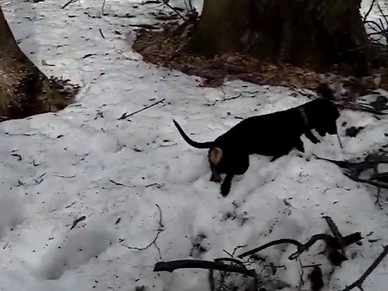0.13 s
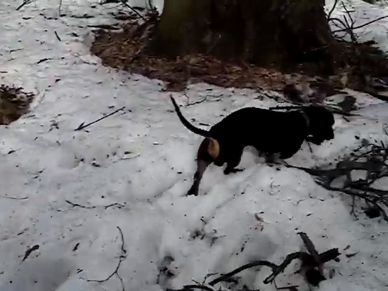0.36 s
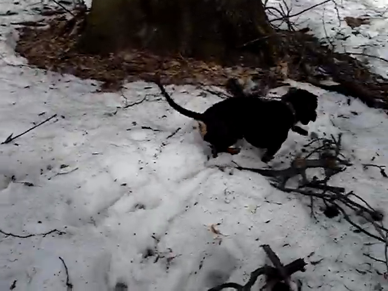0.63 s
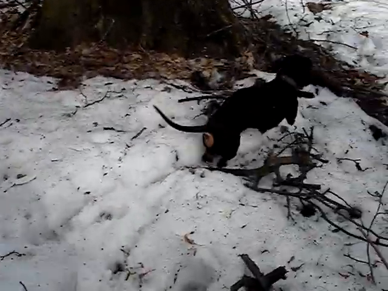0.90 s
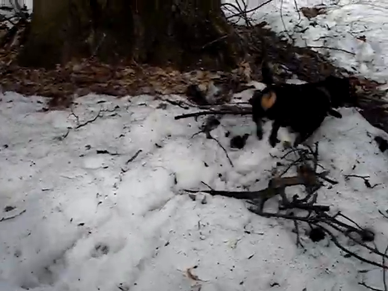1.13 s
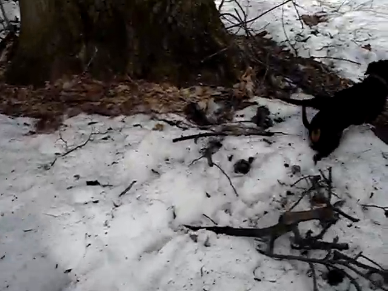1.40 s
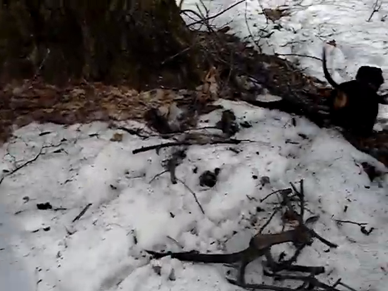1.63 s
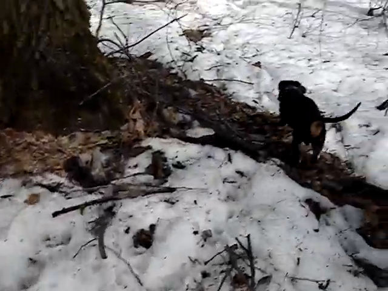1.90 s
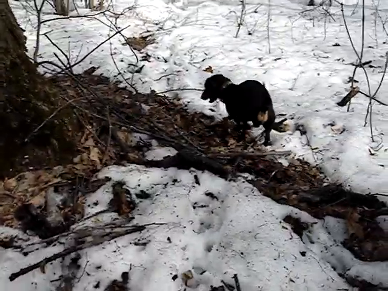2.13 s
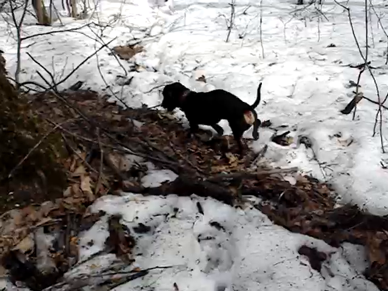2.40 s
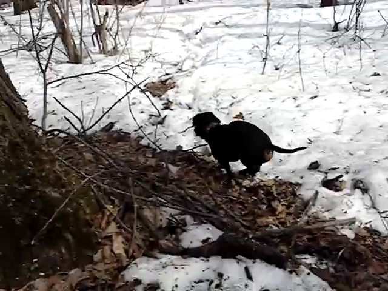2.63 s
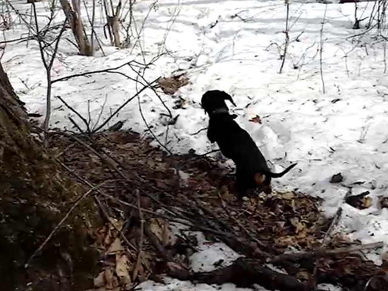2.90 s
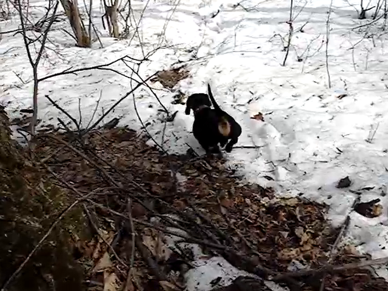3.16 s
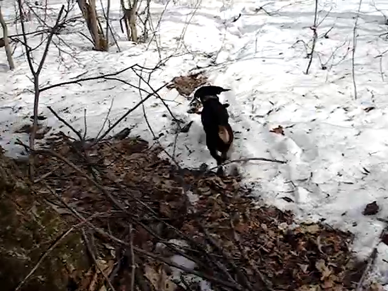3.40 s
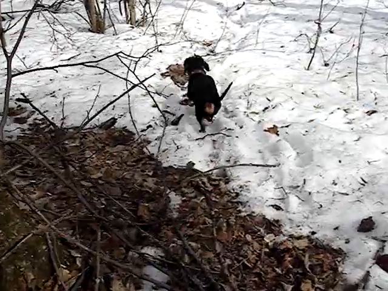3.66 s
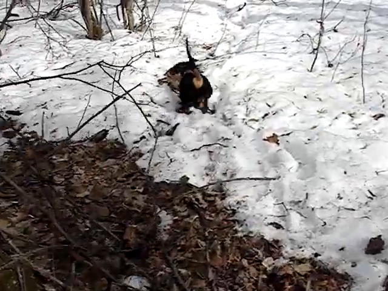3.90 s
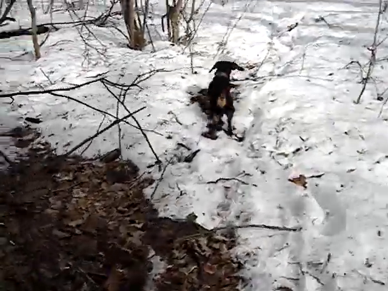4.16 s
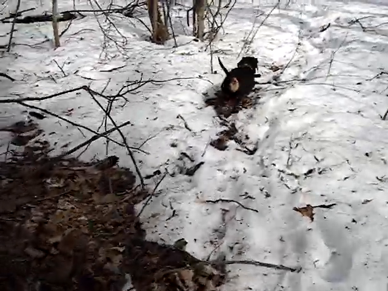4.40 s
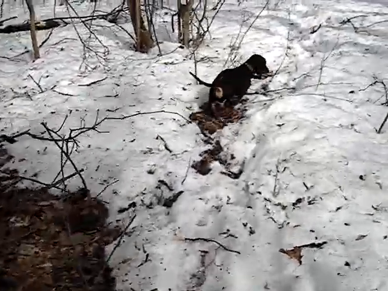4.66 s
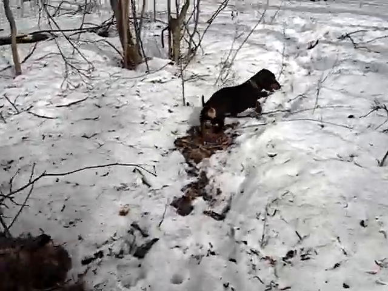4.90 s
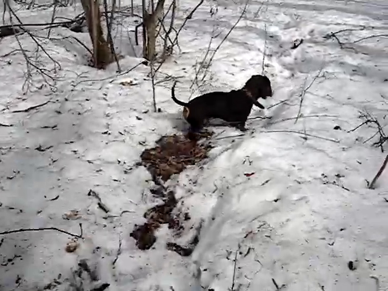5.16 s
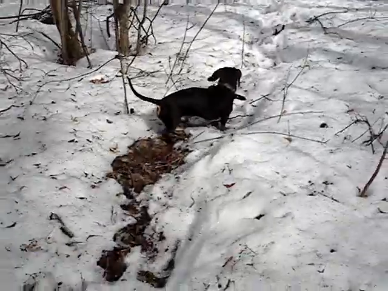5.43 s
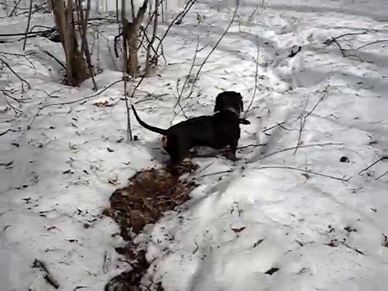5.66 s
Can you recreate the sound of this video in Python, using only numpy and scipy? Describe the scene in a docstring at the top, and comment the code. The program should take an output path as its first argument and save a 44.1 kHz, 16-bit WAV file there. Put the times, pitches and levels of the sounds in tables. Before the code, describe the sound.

Someone walks through crusty snow in a quiet wood, holding a small camera. Dull crunches, crackling crust and fine icy hiss come in uneven bursts. Low casing bumps and a buckle clack come early, then brittle twig snaps throughout, the strongest before three seconds. Later the steps thin into pauses, with one last crunch at the end. Faint steady circuit hiss lies underneath.

```python
"""Boots crush crusty snow, heard by a hand-held camera: bursts of random fractures in three grain sizes
give a dull crunch of packing, a crackle of crust and a fine hiss of crystals. Damped modes and dry noise snap
as twigs and ice, and a loose buckle clacks with its own set of modes. Single pushes jolt the camera and short
scraping tones bump its casing; a dull rustle, stirring bass air and steady circuit hiss lie underneath."""
import sys
import numpy as np
from scipy import signal
from scipy.fft import rfft, irfft, next_fast_len
from scipy.io import wavfile
from scipy.ndimage import uniform_filter1d

SR = 44100
rng = np.random.default_rng(int(sys.argv[2]) if len(sys.argv) > 2 else 0)


def elevation(decibels):
    """Turn decibel levels (scalar or array-like) into linear amplitude ratios."""
    levels = np.asarray(decibels, float)
    return 10 ** (levels / 20)


def transcribe(signal):
    """Save signal, clipped to [-1, 1], as a 16-bit WAV file at the path in sys.argv[1]."""
    frames = np.atleast_2d(signal).T
    limited = np.clip(frames, -1, 1)
    pcm = np.round(limited * 32767).astype(np.int16)
    wavfile.write(sys.argv[1], SR, pcm)


N = 255339
TIME = np.arange(N) / SR
SHORT = TIME[:2000]  # time axis of the small impacts
ONSET = np.clip(SHORT / 0.00059, 0, 1)  # a break takes a moment to run through


def colour(x, points):
    """Causal filter that follows (Hz, dB) points, from the folded cepstrum of the log gain."""
    hz, db = np.transpose(points)
    size = 4096
    grid = np.maximum(np.arange(size // 2 + 1) * SR / size, 1)
    log_gain = np.interp(np.log(grid), np.log(hz), db) * np.log(10) / 20
    cepstrum = irfft(log_gain)
    cepstrum[1:size // 2] *= 2
    cepstrum[size // 2 + 1:] = 0
    impulse = irfft(np.exp(rfft(cepstrum)))[:size // 2]
    return signal.fftconvolve(x, impulse)[:len(x)]


def unit(x):
    """Scale to rms 1."""
    return x / np.sqrt(np.mean(x ** 2))


def walk(rate):
    """Random levels joined every 1 / rate s, with the slow drift taken out; spread 1."""
    steps = rng.standard_normal(int(N / SR * rate) + 2)
    steps = steps - uniform_filter1d(steps, size=5)
    return unit(np.interp(TIME * rate, np.arange(len(steps)), steps))


def flicker(depth_db, wander):
    """Gain that wanders by depth_db and about keeps the mean power."""
    return elevation(depth_db * wander - depth_db ** 2 * np.log(10) / 20)


def grains(rate, spread_db):
    """Random fractures, rate per second: many tiny, a few large."""
    happens = rng.random(N) < rate / SR
    size = rng.exponential(size=N)
    sign = rng.standard_normal(N)
    return happens * elevation(spread_db * size) * sign


def add(out, s, sound):
    """Mix a short sound in at s seconds."""
    i = int(s * SR)
    out[i:i + len(sound)] += sound[:N - i]


def ring(hz, t60):
    """One damped mode, falling 60 dB in t60 seconds."""
    return np.sin(2 * np.pi * hz * SHORT) * np.exp(-np.log(1000) * SHORT / t60)


def patchy_texture(x, depth_db):
    """Uneven, patchy texture: each half octave flickers at random on its own, more strongly towards the treble."""
    size = next_fast_len(N)
    spectrum, hz = rfft(x, size), np.arange(size // 2 + 1) * SR / size
    octave = np.log2(np.maximum(hz, 1) / 250)
    out = irfft(spectrum * np.clip(-2 * octave, 0, 1), size)[:N]  # the lowest part stays steady
    for k, depth in enumerate(np.linspace(*depth_db, 12)):
        share = np.clip(1 - np.abs(2 * octave - k), 0, 1)
        out += irfft(spectrum * share, size)[:N] * flicker(depth, walk(55))
    return out


# Swells of the crushing snow: (peak time [s], level [dB], depth [dB], rise [s], fall [s]);
# depth lifts the packing and lowers the fine crystals; rise and fall play no shorter than 0.003 s
CRUNCHES = [(0.0, -52, -1.5, .1, 0.091), (0.121, -42, 7.5, 0.0065, 0.019), (.14, -43, 1.5, 0.045, 0.086),
            (.227, -41, 4, 0.031, 0.019), (.378, -48.5, -3, 0.098, 0.0053),
            (0.458, -40.5, -5.5, 0.039, .04), (0.528, -31.5, 2.5, 0.063, 0.054),
            (.57, -39, 4.5, 0.028, 0.083), (.62, -41.5, -1, 0.041, 0.077), (.72, -40, 4, 0.035, .03),
            (.737, -32.5, 3, 0.014, 0.037), (.9, -41, 0, 0.07, 0.037), (.992, -39, -0.5, 0.049, 0.049),
            (1.079, -37, 0, 0.0043, 0.016), (1.195, -40, -2, 0.054, 0.031),
            (1.35, -42.5, -0.5, 0.086, 0.021), (1.374, -33, 3.5, 0.033, 0.016),
            (1.442, -34.5, -2, 0.058, 0.017), (1.47, -43.5, 4, 0.037, 0.042),
            (1.515, -41, -1.5, 0.046, 0.019), (1.591, -52, -1, 0.0084, .045),
            (1.72, -45.5, -0.5, 0.088, 0.055), (1.897, -40, -0.5, 0.074, 0.021),
            (1.929, -35, -1.5, 0.021, 0.032), (1.971, -38.5, -7, 0.016, 0.046),
            (2.015, -30, 3, 0.052, 0.064), (2.108, -38.5, 2.5, 0.032, 0.084),
            (2.269, -45.5, -1.5, 0.03, 0.084), (2.386, -37.5, -4, 0.0049, 0.02),
            (2.476, -48, -3, 0.011, 0.12), (2.674, -30.5, 1, 0.056, 0.033), (2.719, -36, 4.5, 0.049, 0.026),
            (2.8, -41, 2.5, 0.041, 0.022), (2.884, -41.5, -3.5, 0.048, 0.014),
            (3.016, -49, -3.5, 0.089, 0.02), (3.07, -50.5, -8, 0.0023, 0.032),
            (3.218, -43.5, -1, 0.06, 0.082), (3.338, -43, -4.5, 0.027, 0.079),
            (3.414, -34.5, 3, 0.057, 0.048), (3.48, -41.5, 5, 0.069, .09), (3.536, -42.5, 2, 0.034, 0.034),
            (3.704, -49.5, 1, 0.32, 0.066), (3.82, -42.5, 2, 0.037, 0.018), (3.842, -35, 0, 0.02, 0.024),
            (3.948, -50.5, 1.5, 0.073, 0.12), (4.077, -32, 5, 0.0032, 0.033), (4.11, -40.5, 6, .02, 0.018),
            (4.168, -32, 3.5, 0.036, 0.035), (4.311, -39.5, 4, 0.092, 0.028),
            (4.381, -40.5, 4, 0.071, 0.08), (4.6, -50.5, 2, .13, 0.11), (4.8, -50, 0.5, 0.094, 0.14),
            (4.937, -38, -7, 0.002, 0.036), (4.963, -28, 1, 0.021, 0.039), (5.023, -40, 4.5, 0.051, 0.033),
            (5.075, -42.5, -0.5, .04, 0.1), (5.215, -55.5, -5.5, 0.15, .05),
            (5.3, -51.5, -1.5, 0.074, 0.069), (5.5, -56, -1.5, 0.36, .12), (5.626, -47, 0, .007, 0.028),
            (5.69, -39, 3.5, 0.0078, 0.035), (5.735, -28.5, 3, 0.039, 0.042)]
# How icy the crust is along the path: (time [s], crust level [dB])
GROUND = [(0.0, 1), (0.75, -4), (1.0, 3.5), (1.45, 2), (2.0, -1), (2.3, 4), (2.7, -0.5), (3.2, 3.5),
          (3.5, -1.5), (3.85, 2), (4.15, 2), (4.4, -0.5), (5.0, 0.5), (5.7, -1.5)]
# Tone of the dull deep packing: (frequency [Hz], relative level [dB])
PACK = [(100, -32.5), (250, -12), (400, -6.5), (650, -2), (900, -2.5), (1300, -3.5), (1700, -12.5),
        (2500, -44)]
# Tone of the breaking crust: (frequency [Hz], relative level [dB])
CRUST = [(900, -36), (1300, -16), (1600, 1.5), (2500, 0), (3700, -4.5), (4500, -20.5), (6500, -55)]
# Tone of the fine crystals: (frequency [Hz], relative level [dB])
CRYSTAL = [(2600, -46.5), (3600, 0), (4300, 4), (5500, 1), (7500, 0), (10000, -7.5), (11000, -78)]


def snow():
    """Crunches swell and die in three sizes of fracture: crystals lead, crust follows, packing peaks last."""
    at, level_db, depth_db, rise, fall = np.array(CRUNCHES).T[:, :, None]
    icy_db = np.interp(at, *np.transpose(GROUND))
    lag_s = 0.004  # from one depth to the next
    edge = 2.01  # the higher, the flatter the top of a crunch and the more sudden its ends
    coarse = TIME[::64]

    def load(db, lag, fall_scale=1):
        """Gain of one grain size: the crunches add up in power."""
        t = coarse - at - lag
        length = np.maximum(np.where(t < 0, rise, fall * fall_scale), .003)
        power = elevation(2 * db) * np.exp(-2 * (np.abs(t) / length) ** edge)
        return np.interp(TIME, coarse, np.sqrt(power.sum(axis=0)))

    # the sole slips in small jerks, which shake every grain size together
    jerk = walk(90)
    big = unit(grains(1500, 1.5))  # large fractures heard in all three layers
    pack = unit(colour(big + 1.47 * unit(grains(5000, 0.45)), PACK))
    crust = unit(colour(0.63 * big + unit(grains(7000, 1.6)), CRUST))
    crystal = unit(colour(0.058 * big + unit(grains(15000, 2.4)), CRYSTAL))

    pack_load = load(level_db + depth_db + 0.09, lag_s, fall_scale=0.92)
    crust_load = load(level_db + 0.1 * depth_db + icy_db - 1.0, 0)
    crystal_load = load(level_db - depth_db + 0.8, -lag_s)
    return (pack * pack_load * flicker(0.25, jerk)
            + crust * crust_load * flicker(0.27, jerk)
            + crystal * crystal_load * flicker(1.68, jerk))


# Tone of the rustle of movement: (frequency [Hz], relative level [dB])
RUSTLE = [(60, -11), (140, -8.5), (220, 0.5), (500, 5.5), (950, 0.5), (1500, -18), (3000, -15), (6000, -35)]


def rustle():
    """A dull rustle of dense random grains while the walker moves, fading out over 0.36 s."""
    silent_s = 5.16
    moving = np.clip((silent_s - TIME) / 0.36, 0, 1)
    return unit(colour(grains(6000, 2.5), RUSTLE)) * elevation(-48) * moving


# Air stirring at the microphone port: (time [s], level [dB])
STIR = [(0.0, -60), (0.4, -51), (0.6, -60), (3.2, -66.5), (3.7, -69), (5.05, -62.5), (5.27, -77)]


def stirring_air():
    """Bass noise that swells and sinks slowly, with a quicker unsteadiness on top."""
    bass = unit(colour(rng.standard_normal(N), [(20, -9), (65, 20.5), (130, 6.0), (300, -39), (2000, -83)]))
    swell = elevation(np.interp(TIME, *np.transpose(STIR)))
    return bass * swell * flicker(2.5, walk(8.2))


# Tone of the circuit hiss: (frequency [Hz], relative level [dB])
HISS = [(20, -8), (150, -7.5), (400, 0), (610, 3), (1300, 2), (2200, -7.5), (6500, -28), (10500, -28)]


def hiss():
    """Steady noise of the preamplifier, with a narrow high band around 7.7 kHz."""
    steady = unit(colour(rng.standard_normal(N), HISS)) * elevation(-53.5)
    band = [(6500, -37), (7400, -16), (7700, 18), (8000, 1), (9000, -23)]
    whistle = unit(colour(rng.standard_normal(N), band)) * elevation(-68.0)
    return steady + whistle


# Fingers on the casing: (centre time [s], level [dB], pitch [Hz])
BUMPS = [(0.192, -45, 111), (0.212, -29.5, 121), (0.243, -26, 333), (.262, -30.5, 187), (0.28, -25, 191),
         (.3, -29.5, 168), (.323, -31, 160), (0.334, -39, 130), (0.402, -32.5, 141), (3.84, -26.5, 240),
         (4.08, -28.5, 225), (4.6, -32, 244)]


def bumps():
    """Soft, scraping bumps ring the casing for a cycle or two under a bell-shaped swell."""
    out = np.zeros(N)
    half_cycles = 1.1  # half length of a bump, in cycles of its pitch
    centre = TIME[1000]
    t = SHORT - centre
    for (s, db, hz), rub in zip(BUMPS, rng.standard_normal((len(BUMPS), 2000))):
        tone = np.cos(2 * np.pi * hz * t)
        scrape = 2.2 * uniform_filter1d(rub, size=60)
        swell = np.exp(-2 * (t * hz / half_cycles) ** 2)
        add(out, s - centre, -elevation(db) * (tone + scrape) * swell)
    return out


# Breaking twigs and ice: (time [s], level [dB], pitch [Hz], knock against it [dB], dry crack against it [dB])
SNAPS = [(.35, -33, 2820, -30, 4), (1.5551, -28, 4580, -22, 3), (1.5767, -29, 4240, -29, 3),
         (1.5842, -28, 3200, -25, 3), (1.6246, -31, 3940, -13, 2), (1.7274, -22, 3430, -10, 5),
         (1.7963, -33, 1200, -14, 6), (1.8831, -18, 2220, -12, 0), (1.9012, -26, 2800, -8, 3),
         (2.1195, -22, 1190, -4, 0), (2.2964, -29, 2190, -16, 0), (2.381, -22, 2440, -6, -2),
         (2.4139, -31, 3100, -13, 0), (2.4718, -27, 3850, -16, 0), (2.51, -29, 3500, -22, -2),
         (2.6724, -10, 1900, -2, -4), (2.688, -20, 1740, -14, 0), (2.8885, -14, 3250, -20, -5),
         (2.9684, -33, 4800, -19, 0), (3.0627, -24, 3700, -28, 3), (3.695, -27, 2170, -5, -2),
         (3.836, -17, 2100, -3, -2), (4.0715, -20, 2060, -5, -2), (4.62, -22, 1840, -6, -6),
         (4.7103, -31, 2700, -8, 0), (4.9853, -19, 1250, -7, 2), (5.0536, -25, 4500, 2, 4),
         (5.0633, -16, 4700, -6, 11), (5.0938, -22, 3000, -4, 7), (5.1088, -30, 1900, -14, 6),
         (5.1135, -28, 1550, -14, 5), (5.118, -29, 1570, -16, 6), (5.2103, -30, 3160, -27, 0),
         (5.2284, -24, 1230, -33, -4), (5.445, -39, 1060, -23, 5), (5.4894, -37, 1240, 0, 3)]


def snaps():
    """A brittle break: short modes, a dull knock, and a pressure dip that rebounds, with a dry spray."""
    out = np.zeros(N)
    t60 = 0.014  # ring of a twig, s
    chance, crack = rng.random((len(SNAPS), 3)), rng.standard_normal((len(SNAPS), 2000))
    dip = np.exp(-((SHORT - .0004) / .0001) ** 2)
    rebound = .08 * np.exp(-((SHORT - .0016) / .001) ** 2)
    for (s, db, hz, knock_db, crack_db), c, noise in zip(SNAPS, chance, crack):
        upper = .7 * ring(hz * (1.1 + .3 * c[0]), .7 * t60)
        lower = .7 * ring(hz * (.7 + .2 * c[1]), .7 * t60)
        body = ring(hz, t60) + upper + lower
        knock = elevation(knock_db) * ring(550 + 300 * c[2], 0.89 * t60)
        spray = .7 * uniform_filter1d(noise, size=3) * np.exp(-np.log(1000) * SHORT / t60)
        dry_crack = elevation(crack_db) * (dip - rebound + spray * ONSET)
        add(out, s + .0007, -elevation(db) * ((body + knock) * ONSET + dry_crack))
    return out


# Clacks of the loose buckle: (time [s], level [dB])
CLACKS = [(0.3722, -8), (1.6062, -8.5), (4.6956, -12)]
# Modes of the buckle: (frequency [Hz], level [dB], time to fall 60 dB [s])
BUCKLE = [(1840, -26.5, 0.049), (2404, -10, 0.022), (2810, -11.5, 0.021), (3310, -12, 0.019),
          (4600, -18, 0.016), (5020, -19.5, 0.014), (5710, -14, 0.011)]


def buckle():
    """One small hard object: the same modes in slightly different balance each time, roughened by noise."""
    out = np.zeros(N)
    chance = rng.standard_normal((len(CLACKS), len(BUCKLE)))
    rattle = rng.standard_normal((len(CLACKS), 2000))
    for (s, db), c, noise in zip(CLACKS, chance, rattle):
        clack = np.zeros(2000)
        for k, ((hz, mode_db, t60), change) in enumerate(zip(BUCKLE, c)):
            clack += (-1) ** k * elevation(mode_db + 1.8 * change) * ring(hz, t60)
        rough = 1 + .45 * unit(uniform_filter1d(noise, size=30))
        add(out, s, elevation(db) * clack * rough * ONSET)
    return out


# Jolts of the camera by steps: (time [s], level [dB], time constant of the push [s])
JOLTS = [(2.385, -39, 0.0083), (2.668, -47, 0.0044), (2.889, -44, 0.0076), (3.056, -57, 0.0049),
         (3.42, -49, .008), (4.973, -37, 0.01), (5.064, -34, 0.0045), (5.095, -46, 0.018)]


def jolts():
    """A jolt through the hand pushes the diaphragm once, and it swings slowly back."""
    out = np.zeros(N)
    for s, db, push in JOLTS:
        t = TIME[:8000] / push
        add(out, s, elevation(db) * np.e * t * np.exp(-t) * np.cos(0.17 * t))
    return out


def scene():
    """Everything at one small microphone."""
    patchy = patchy_texture(snow() + rustle() + stirring_air(), (2.1, 3.0))  # flicker, dB: low to high bands
    return (patchy + hiss() + bumps() + snaps() + buckle() + jolts())[None]


def top_cut(x):
    """Nothing passes above the cut-off."""
    return signal.sosfilt(signal.butter(12, 10400, fs=SR, output="sos"), x)


def record(dry):
    """The camera cuts the top steeply, above 10150 Hz."""
    low_pass = signal.ellip(10, .3, 65, 10150, fs=SR, output="sos")
    mix = signal.sosfilt(low_pass, dry)
    return top_cut(mix)


dry = scene()
out = record(dry)
transcribe(out)
```